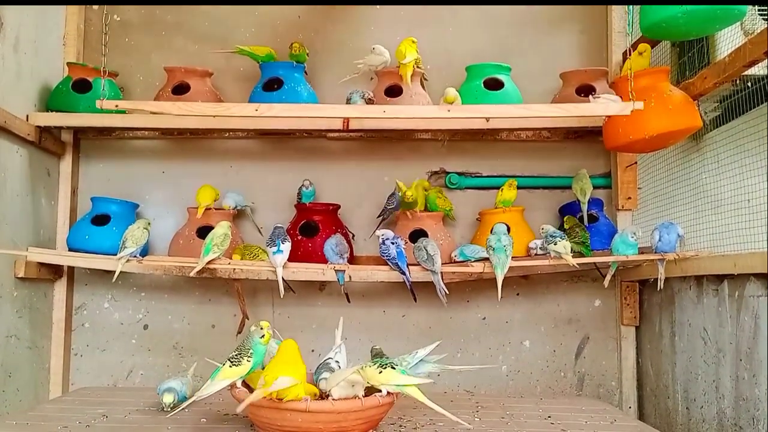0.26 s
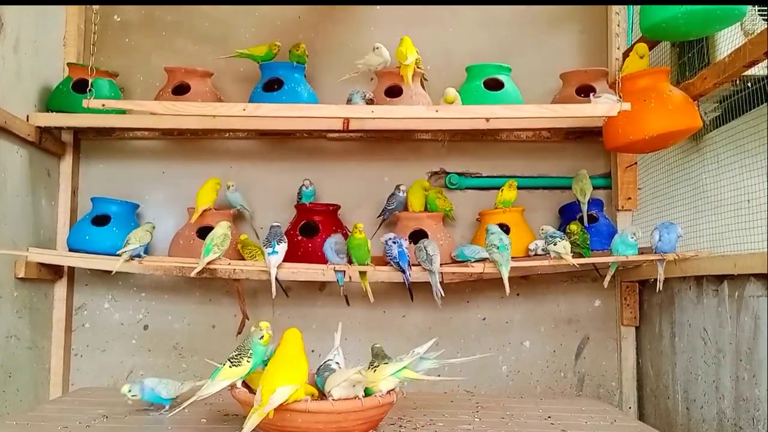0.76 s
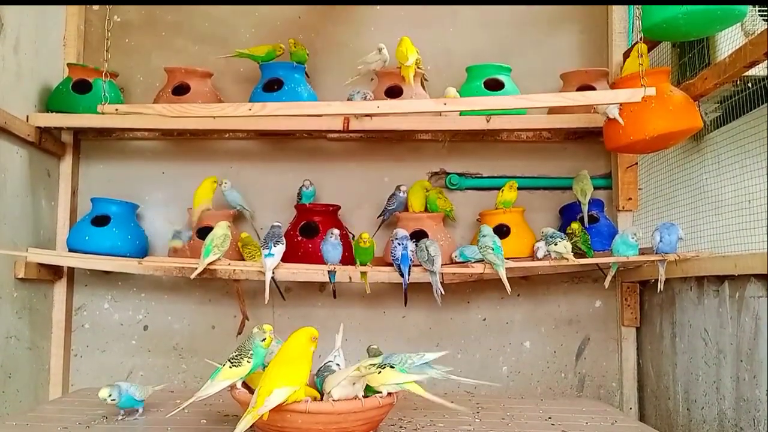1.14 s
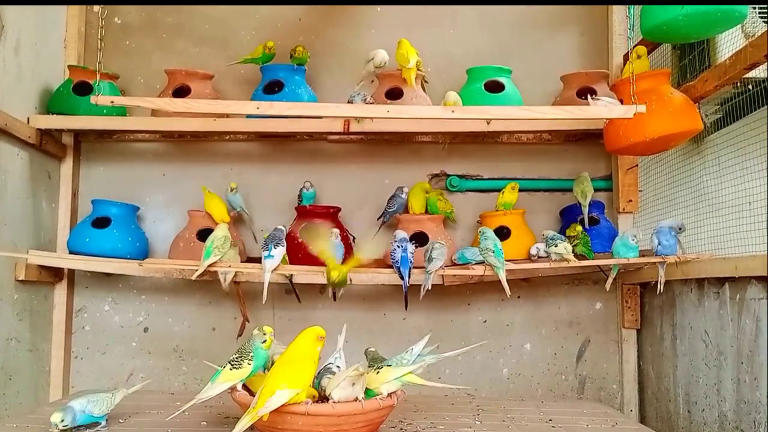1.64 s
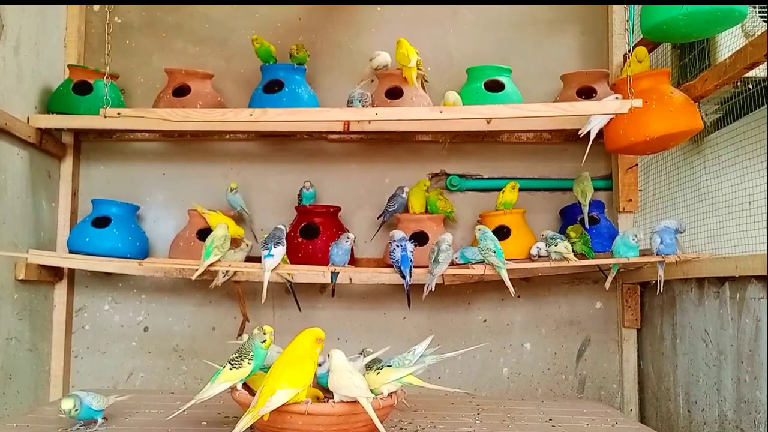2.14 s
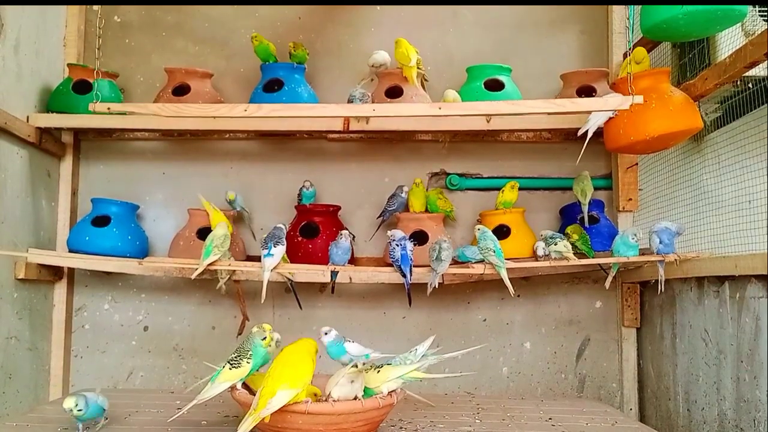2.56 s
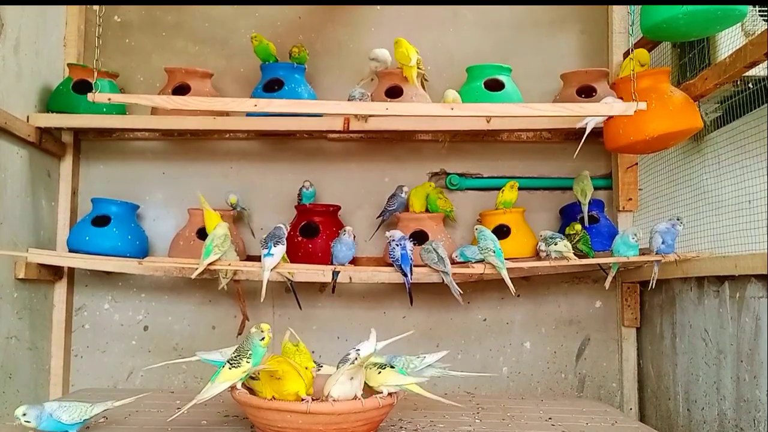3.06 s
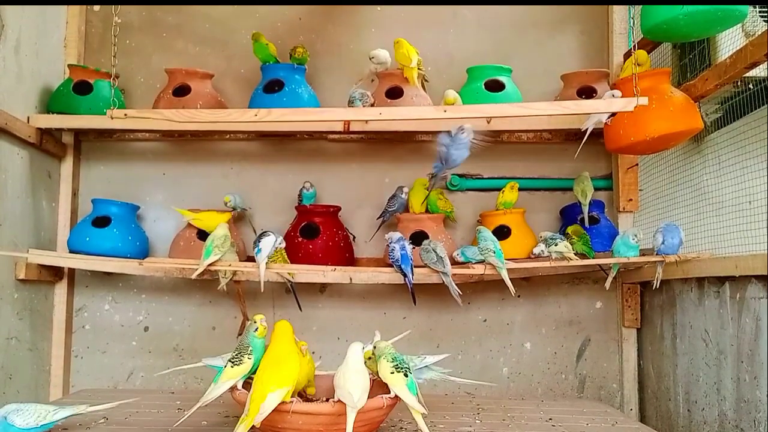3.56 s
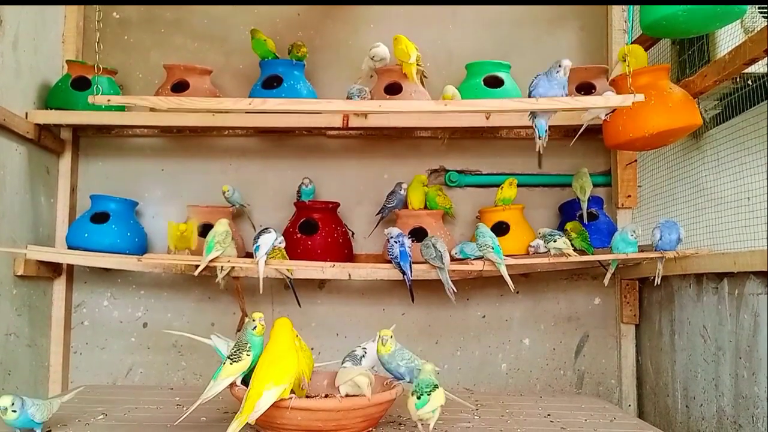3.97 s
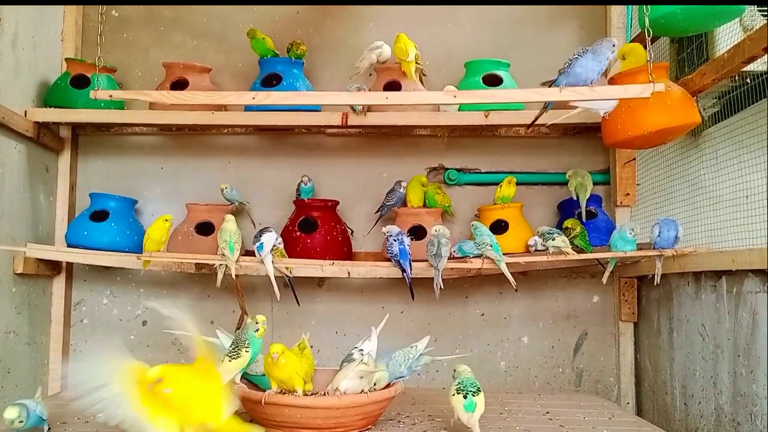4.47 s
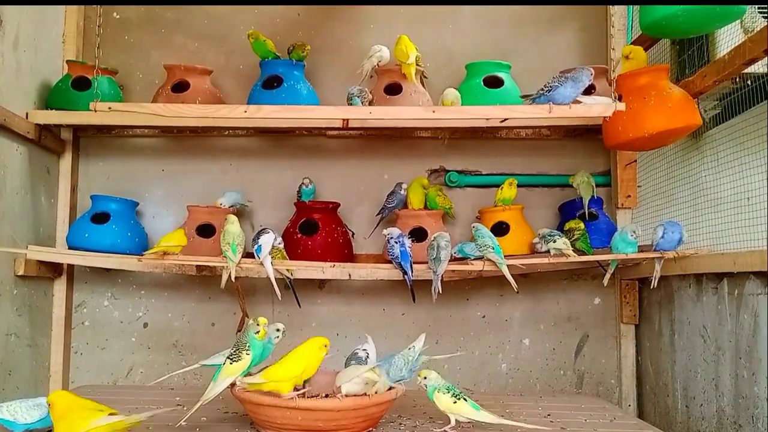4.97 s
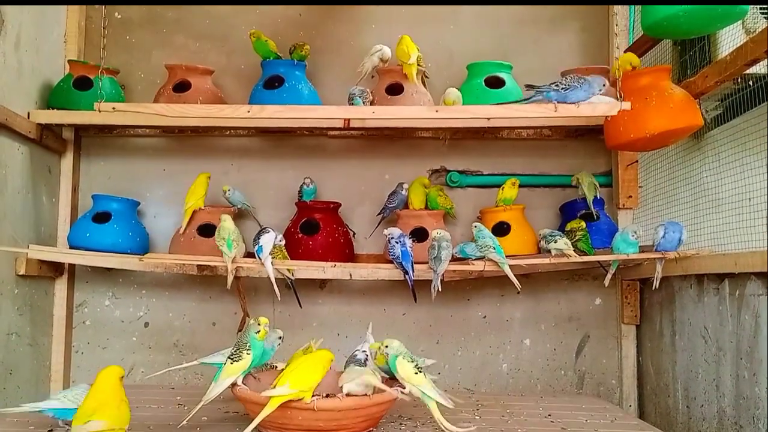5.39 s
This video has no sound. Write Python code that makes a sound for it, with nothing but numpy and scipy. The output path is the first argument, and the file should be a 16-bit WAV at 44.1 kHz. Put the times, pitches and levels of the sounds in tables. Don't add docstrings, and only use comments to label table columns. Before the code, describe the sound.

In a small hard-walled aviary, parrots begin with faint whistles and scattered peeps, then burst into bright cheeps and rough squawks. A hollow, throaty dove call sounds behind them, returns louder around the middle, and gives way to sharp screeches and warbles. Wing beats push low soft rumbles past a slightly hissy nearby microphone.

```python
import sys
import numpy as np
from scipy import signal
from scipy.fft import rfft, irfft
from scipy.io import wavfile

SR = 44100
rng = np.random.default_rng(int(sys.argv[2]) if len(sys.argv) > 2 else 0)


def convert_level_to_amplitude(level_db):
    exponent = np.asarray(level_db, float) / 20
    return 10 ** exponent


def bounce(signal):
    frames = np.transpose(np.atleast_2d(signal))
    limited = np.clip(frames, -1, 1)
    pcm = np.round(limited * 32767).astype(np.int16)
    wavfile.write(sys.argv[1], SR, pcm)


N = 247842


def at_hz(points, hz):
    table_hz, table_db = np.transpose(points)
    return np.interp(np.log(np.maximum(hz, 1)), np.log(table_hz), table_db)


def coloured(x, points):
    gain = convert_level_to_amplitude(at_hz(points, np.fft.rfftfreq(len(x), 1 / SR)))
    return irfft(rfft(x) * gain, len(x))


def rms_one(x):
    return x / np.sqrt(np.mean(x ** 2))


def noise_band(points):
    return rms_one(coloured(rng.standard_normal(N), points))


def wobble(rate_hz):
    r = np.exp(-2 * np.pi * rate_hz / SR)
    noise = rng.standard_normal(N + SR)
    return rms_one(signal.lfilter([1], [1, -2 * r, r * r], noise)[SR:])


def add(out, start_s, sound):
    i = round(start_s * SR)
    out[i:i + len(sound)] += sound[:N - i]


def wing_push():
    # (time [s], length [s], level [dB])
    beats = [(0.146, .06, -73), (0.457, 0.12, -67), (0.665, 0.036, -58), (.81, .05, -73),
             (1.047, 0.089, -71), (1.38, 0.069, -74), (1.847, 0.28, -61.5), (2.24, 0.048, -65),
             (2.622, 0.048, -61.5), (3.55, 0.034, -58.5), (3.664, 0.083, -61), (4.113, 0.11, -56.5),
             (4.674, 0.12, -57.5), (5.297, 0.14, -63.5)]
    steady_db, rise_share = -75, 0.36
    t = np.arange(N) / SR
    gain = np.full(N, convert_level_to_amplitude(steady_db))
    for s, length_s, level_db in beats:
        rise = (s - t) / (rise_share * length_s)
        fall = (t - s) / length_s
        gain += convert_level_to_amplitude(level_db) * np.exp(-2 * np.maximum(rise, fall))
    return gain


def air():
    # (frequency [Hz], level [dB per Hz])
    rumble_db = [(18, -62), (30, -29), (48, -2), (70, 5.5), (104, 5.5), (141, -7.5), (170, -15.5),
                 (220, -15), (370, -120)]
    # (frequency [Hz], level [dB per Hz])
    hiss_db = [(88, -5), (150, 5), (249, 3), (1090, -7.5), (1670, -6), (2320, -8.5), (3050, -11),
               (4160, -14), (4960, -12.5), (7900, -25), (9600, -14), (11900, -29), (15600, -25)]
    # (time [s], length [s], level [dB])
    rustles = [(1.91, .04, -69), (1.955, .03, -69), (1.997, .03, -67), (2.185, .004, -68),
               (2.688, .02, -63), (3.895, .012, -70), (4.726, .02, -60), (4.781, .004, -57),
               (4.868, .004, -57), (5.371, .008, -57), (5.46, .03, -62), (5.259, .004, -68)]
    out = noise_band(rumble_db) * wing_push() * convert_level_to_amplitude(0.91 * wobble(5))
    out += noise_band(hiss_db) * convert_level_to_amplitude(-72.5 + 2.2 * wobble(5.1))
    bright = noise_band([(3000, -71), (9500, 9.5), (12500, -1), (15000, 5.5)])
    for s, length_s, level_db in rustles:
        t = np.arange(round(3 * length_s * SR)) / SR
        add(out, s, convert_level_to_amplitude(level_db) * np.exp(-t / length_s) * bright[round(s * SR):][:len(t)])
    return out


def voice(pitch_hz, overtone_db):
    phase = 2 * np.pi * np.cumsum(pitch_hz) / SR
    out = np.sin(phase)
    for k in range(2, int(15500 / np.median(pitch_hz)) + 1):
        out += convert_level_to_amplitude(overtone_db(k)) * np.sin(k * phase + k * k)
    return np.sqrt(2) * out


def sung(rows, shake, throb, unsteady, throb_db, overtone_db):
    s, pitch_hz, level_db = np.transpose(rows)
    t = np.arange(s[0], s[-1], 1 / SR)
    at = (t * SR).astype(int) % N
    edge = np.clip(np.minimum(t - s[0], s[-1] - t) / 0.0016, 0, 1)
    tone = voice(np.interp(t, s, pitch_hz) * (1 + unsteady * shake[at]), overtone_db)
    return convert_level_to_amplitude(np.interp(t, s, level_db) + throb_db * throb[at]) * edge * tone


def dove():
    # (time [s], level [dB])
    opening_times = [
        (.55, -53),
        (2.949, -48),
    ]
    # (time from start [s], pitch [Hz], level [dB])
    opening_curve = [
        (0, 256, -16),
        (.04, 221.7, -7),
        (0.111, 250, -20.5),
    ]
    # (time [s], pitch [Hz], level [dB])
    coo_notes = [
        [(.72, 246, -66), (.76, 244.7, -60.5), (.9, 305.4, -50), (1.1, 318, -51.5), (1.13, 317, -71),
         (1.17, 347, -47), (1.36, 328, -52.5), (1.47, 231, -64)],
        [(1.42, 524, -67.5), (1.49, 487, -65), (1.53, 413, -59.5), (1.68, 418, -78.5)],
        [(3.12, 268, -72), (3.17, 251.3, -55), (3.32, 283, -64.5), (3.35, 282.4, -53), (3.6, 358.6, -44.5),
         (3.84, 356, -46), (3.9, 360, -82)],
        [(3.9, 405, -63.5), (4.03, 431, -62), (4.07, 457, -71), (4.14, 439, -61), (4.18, 445, -80)],
        [(3.9, 293, -64), (4.08, 275, -69.5)],
    ]
    flutter_hz = 48.0 * (1 + 0.296 * wobble(8.12))
    flutter = np.sin(2 * np.pi * np.cumsum(flutter_hz) / SR) + 0.7 * wobble(29)
    flutter = np.minimum(flutter, 1)
    out, shake = np.zeros(N), wobble(39.0)
    openings = [[(s + u, hz, level_db + db) for u, hz, db in opening_curve] for s, level_db in opening_times]
    for rows in openings + coo_notes:
        note = sung(rows, shake, flutter, unsteady=.065, throb_db=5, overtone_db=lambda k: -18 * k)
        add(out, rows[0][0], note)
    return out


def warbles(shake, throb):
    # (time [s], pitch [Hz], level [dB])
    warble_curves = [
        [(0.29, 1860, -63.5), (0.33, 1572, -63), (0.42, 2137, -64.5), (0.444, 1503, -56), (0.52, 1322, -70.5)],
        [(0.5, 1614, -69), (0.518, 2300, -56), (0.594, 2586, -69), (0.63, 2170, -60)],
        [(0.52, 2844, -60), (0.594, 3040, -69), (0.616, 3335, -51.5), (0.66, 2600, -90)],
        [(2.396, 2150, -60), (2.406, 2112, -49), (2.418, 2300, -60), (2.44, 2610, -52), (2.475, 2480, -51),
         (2.5, 2800, -56)],
        [(2.29, 3247, -68), (2.424, 3320, -66), (2.51, 3200, -45), (2.62, 3020, -77)],
        [(2.7, 3193, -55.5), (2.758, 3085, -76), (2.97, 3040, -66)],
        [(3.045, 2600, -60), (3.068, 3030, -56), (3.09, 3070, -51), (3.11, 3000, -62)],
        [(3.25, 2920, -67), (3.264, 2212, -47.5), (3.33, 2990, -54.5)],
        [(4.825, 3920, -43.5), (4.847, 3255, -39.5), (4.87, 3080, -46), (4.895, 3000, -55), (4.915, 3600, -42),
         (4.93, 3700, -52)],
        [(4.962, 4200, -56), (4.985, 3800, -41), (5.01, 3500, -44), (5.035, 3050, -48), (5.05, 2950, -62)],
        [(4.96, 2107, -65), (5.02, 1500, -50), (5.055, 1520, -66), (5.09, 1650, -55), (5.12, 1600, -64)],
    ]
    out = np.zeros(N)
    for rows in warble_curves:
        note = sung(rows, shake, throb, unsteady=.02, throb_db=4.0, overtone_db=lambda k: -34 - 4.0 * (k - 2))
        add(out, rows[0][0], note)
    return out


def chirp_rows():
    # (time [s], length [s], goal pitch [Hz], level [dB], second partial [dB])
    cheeps = [(1.036, 0.017, 3240, -46, 2), (1.111, 0.017, 3113, -50, -10), (1.453, 0.025, 2674, -60, 6),
              (1.524, 0.032, 2597, -60, 2), (1.607, 0.029, 2566, -55, 14), (1.667, 0.022, 2590, -55, 10),
              (1.675, .029, 2800, -51.5, 13), (1.749, 0.019, 2404, -45.5, 10.5),
              (1.76, 0.015, 2810, -40.5, 11.5), (1.833, .012, 2482, -39, 9.5),
              (2.471, 0.055, 3154, -48, -10), (4.778, 0.025, 2480, -61.5, 18),
              (5.399, 0.016, 2297, -60, 13), (5.459, .016, 2560, -58.5, 11.5),
              (5.363, 0.024, 3230, -57.5, -21)]
    # (time [s], length [s], goal pitch [Hz], level [dB])
    back_cheeps = [
        (3.301, 0.018, 2925, -49),
        (3.387, 0.023, 3160, -53.5),
        (3.446, .026, 3100, -50),
        (3.583, .02, 3110, -51.5),
        (3.717, 0.02, 2990, -53),
        (3.804, 0.025, 3283, -39),
        (4.045, .025, 2745, -41.5),
        (4.199, 0.03, 2850, -41),
    ]
    # (time [s], length [s], pitch [Hz], level [dB])
    peeps = [(.369, 0.056, 4000, -69.5), (.439, 0.028, 9100, -63.5), (.628, 0.015, 1965, -57),
             (.575, .02, 4640, -56), (.911, 0.03, 3100, -50), (.914, .03, 6100, -58),
             (1.396, .04, 1588, -66), (1.993, .05, 1850, -72), (2.013, .044, 2283, -65.5),
             (2.035, 0.05, 3320, -59.5), (2.059, 0.11, 3020, -67), (2.199, 0.042, 729, -55),
             (2.652, .0093, 3770, -52), (2.29, .11, 1530, -61), (2.98, 0.063, 452, -66),
             (3.078, 0.064, 7860, -73), (3.009, 0.017, 2015, -55.5), (3.089, 0.05, 5440, -51.5),
             (3.161, .057, 4000, -61), (3.238, 0.045, 3300, -51), (3.493, 0.038, 3367, -48),
             (3.514, 0.056, 2117, -53), (4.342, 0.011, 3270, -45), (4.615, 0.03, 6250, -42),
             (4.585, .04, 4050, -56), (2.632, .015, 2780, -56), (2.378, .02, 2700, -62),
             (1.598, .025, 4000, -56), (5.54, .02, 4200, -62), (5.415, .02, 1320, -66),
             (5.505, .014, 10300, -58), (5.21, .03, 6200, -64), (5.055, .06, 6200, -55),
             (2.945, .03, 1250, -66), (2.955, .02, 2650, -60), (4.873, 0.014, 2525, -45),
             (4.821, 0.015, 2054, -54), (4.997, 0.025, 6400, -52), (5.008, .017, 4420, -50),
             (5.065, 0.016, 3070, -42), (5.082, .04, 3000, -48), (5.204, 0.024, 3050, -45.5),
             (2.835, 0.075, 1290, -64), (4.351, 0.056, 1668, -53), (5.221, 0.04, 1650, -56)]
    # (time [s], length [s], pitch [Hz], level [dB])
    chups = [
        (0.19, 0.023, 1388, -70),
        (2.806, 0.015, 1462, -64),
        (2.958, .023, 4905, -56.5),
        (2.997, 0.048, 3370, -54),
        (3.32, 0.1, 1441, -61.5),
        (3.62, 0.041, 1420, -57),
        (3.829, 0.03, 1440, -55),
        (4.726, 0.035, 3060, -61),
        (5.609, 0.032, 1324, -56.5),
    ]
    # (time [s], length [s], pitch [Hz], level [dB])
    tweets = [
        (.975, 0.02, 2608, -45.5),
        (4.287, 0.02, 2470, -47),
        (4.796, 0.029, 2502, -45),
    ]
    # (time [s], length [s], first pitch [Hz], last pitch [Hz], level [dB])
    slides = [(2.436, 0.052, 2350, 1876, -53), (2.633, 0.012, 5750, 5650, -54.5),
              (2.648, 0.03, 2300, 1500, -56), (2.98, 0.015, 7400, 7350, -58), (3.035, .04, 7000, 8000, -58),
              (3.09, .04, 8100, 8300, -60), (3.56, 0.0454, 3324, 3165, -44.5),
              (1.759, 0.013, 5500, 5700, -18.5), (1.832, 0.013, 4900, 4958, -23),
              (1.455, .025, 9300, 10500, -58), (1.455, .02, 7000, 7900, -56), (1.528, .03, 7300, 7900, -56),
              (1.535, .03, 10200, 10400, -60), (1.112, .03, 8000, 8900, -57), (3.385, .01, 4000, 6500, -50),
              (2.02, .1, 6300, 6800, -66), (4.991, 0.025, 5050, 4850, -43.5),
              (5.334, 0.033, 1850, 2224, -59.5), (3.299, .025, 9800, 11700, -52),
              (.027, .022, 2700, 3250, -60), (.026, .02, 5000, 5300, -55), (4.9, .03, 3500, 4600, -50),
              (4.79, .025, 5000, 5800, -42), (1.588, .02, 5200, 3400, -54), (3.196, .012, 7200, 7000, -55)]
    cheep_first_hz, back_first_hz = 2310, 2260
    rows = [(s, d, cheep_first_hz, hz, db, second_db) for s, d, hz, db, second_db in cheeps]
    beak_hz, second_db_per_khz = 2860, -8.5
    for s, d, hz, db in back_cheeps:
        second_db = 6.5 + second_db_per_khz * (hz - beak_hz) / 1e3
        rows.append((s, d, back_first_hz, hz, db, second_db))
    for table, sag, second_db in [(peeps, 0.05, -16), (chups, 0.029, -3.5), (tweets, 0.043, 7.5)]:
        rows += [(s, d, hz * (1 + sag), hz, db, second_db) for s, d, hz, db in table]
    return rows + [(*row, -22) for row in slides]


def chirps(shake, throb):
    onset_s = .003
    turned_away_s = (3.29, 4.35)
    out = np.zeros(N)
    breath = noise_band([(1200, -31.0), (2200, -7.0), (6000, 12.5), (11000, -7.5), (13000, -25)])
    for s, length_s, first_hz, last_hz, level_db, second_db in chirp_rows():
        u = np.linspace(0, 1, round(np.clip(length_s, .005, .3) * SR))
        at = (round(s * SR) + np.arange(len(u))) % N
        pitch_hz = last_hz + (first_hz - last_hz) * np.exp(-5.5 * u)
        pitch_hz *= 1 + .021 * shake[at]
        fall_db = -22 if turned_away_s[0] < s < turned_away_s[1] else -7
        onset = 0.5 * np.minimum(u * length_s / onset_s, 1) ** 2
        shape = np.minimum(onset + u / 0.75, 1) * np.cos(np.pi * u / 2) ** 0.75
        sound = voice(pitch_hz, lambda k: second_db + fall_db * (k - 2))
        sound += convert_level_to_amplitude(second_db - 14.0) * breath[at]
        add(out, s, convert_level_to_amplitude(level_db + 3.97 * throb[at]) * shape * sound)
    return out


def squawk_calls():
    # (time [s], length [s], pitch [Hz], level [dB], second partial [dB])
    scolds = [
        (.000, 0.024, 3000, -69.5, 10),
        (1.032, 0.026, 1312, -66.5, 2.5),
        (1.589, 0.047, 1998, -65, 7.5),
        (1.752, .078, 1384, -54, 2.5),
        (1.804, 0.045, 1691, -67.5, 17.5),
    ]
    # (time [s], length [s], pitch [Hz], level [dB])
    chatter = [
        (3.177, 0.11, 2420, -62),
        (3.351, 0.11, 2862, -59),
        (3.44, 0.098, 2337, -60),
        (3.508, 0.068, 2613, -52.5),
        (3.577, 0.11, 2406, -65),
        (3.636, 0.078, 2897, -55),
        (3.711, 0.0742, 2377, -53.5),
        (5.458, 0.028, 2494, -61.5),
        (5.485, 0.069, 3370, -55),
        (5.489, 0.04, 846, -63.5),
    ]
    # (time [s], length [s], pitch [Hz], level [dB])
    croaks = [
        (.027, 0.02, 1340, -68),
        (.155, 0.014, 1300, -81),
        (.779, 0.038, 649.3, -71.5),
        (1.219, 0.018, 676, -83.5),
        (1.366, 0.035, 664, -84),
    ]
    # (time [s], length [s], pitch [Hz], level [dB])
    hoarse = [(.335, 0.058, 595, -61), (.48, 0.2, 4140, -68.5), (.056, 0.23, 5470, -69.5),
              (.85, 0.061, 920, -69), (2.145, .12, 5130, -60), (2.275, 0.14, 5200, -66),
              (2.147, 0.085, 1029, -61.5), (2.339, 0.25, 3650, -62.5), (2.43, 0.079, 2504, -50.5),
              (2.633, 0.041, 2004, -56.5), (2.969, 0.076, 3260, -58.5), (3.03, 0.04, 2480, -52),
              (4.66, 0.06, 700, -68), (.853, .04, 3000, -63), (1.02, .03, 3800, -59),
              (3.72, .06, 4700, -46), (4.9, 0.031, 3896, -43), (5.236, 0.07, 1072, -71.5),
              (.538, 0.1, 2616, -65), (0.641, 0.088, 2438, -61), (5.225, 0.085, 4250, -70),
              (4.82, .06, 6550, -52), (1.77, .06, 2500, -47), (1.86, .08, 5500, -52),
              (3.196, .03, 4800, -54)]
    # (time [s], length [s], pitch [Hz], level [dB], share of length before the peak [0-1])
    screeches = [
        (3.927, .068, 3350, -40.5, .42),
        (4.052, .12, 3550, -35, .45),
        (4.262, .055, 2900, -53, .4),
        (4.371, .042, 2680, -44.5, .5),
        (4.476, .066, 2720, -42, .22),
        (4.626, .07, 3170, -44, .4),
    ]
    # (second partial [dB], roughness [0-1])
    kinds = [
        (-2, 0.63),
        (10, .15),
        (-26.5, 0.2),
    ]
    rough, peak_share = .38, .28
    calls = [(*row, rough, peak_share) for row in scolds]
    calls += [(*row, 10.5, rough, peak) for *row, peak in screeches]
    for rows, kind in zip([chatter, croaks, hoarse], kinds):
        calls += [(*row, *kind, peak_share) for row in rows]
    return calls


def squawks(shake, throb):
    # (frequency [Hz], level [dB])
    throat = [(1300, -5), (2500, -3), (4000, 9.5), (6500, 3.5), (8500, -8.5), (11000, -9), (15000, -10.5)]
    pulse_mean_hz, pulse_uneven, pulse_db, pulse_sweep = 205, .17, 12, .2
    rush_share, fizz_db = 1.2, 10.5
    side_on_s, side_on_db = (4.25, 4.45), -14
    out = np.zeros(N)
    rush = noise_band([(1100, -54), (2000, -2.5)] + throat[1:])
    dull = signal.sosfilt(signal.butter(4, 7000, fs=SR, output="sos"), rush)
    fizz = signal.sosfilt(signal.butter(4, 7000, "high", fs=SR, output="sos"), rush)
    pulse_hz = pulse_mean_hz * (1 + pulse_uneven * wobble(60))
    for s, length_s, call_hz, level_db, second_db, rough, peak in squawk_calls():
        u = np.linspace(0, 1, round(np.clip(length_s, .005, .3) * SR))
        at = (round(s * SR) + 3000 + np.arange(len(u))) % N
        turn = 2 * np.pi * np.cumsum(pulse_hz[at]) / SR
        skew = np.log(.5) / np.log(np.clip(peak, .1, .7))
        shape = np.sin(np.pi * u ** skew) ** 0.8
        push_db = np.clip(level_db + second_db + 15.5, -30, 0) + 20 * np.log10(shape + .03)
        push_db += side_on_db * (side_on_s[0] < s < side_on_s[1])
        bend = rough * (.18 * shake[at] - pulse_sweep * np.cos(turn))
        pitch_hz = call_hz * (1 + 0.046 * np.sin(np.pi * u) + bend)

        def overtone_db(k):
            top_db = .5 * push_db * max(np.log2(k * call_hz / 6500), 0)
            return second_db + at_hz(throat, k * call_hz) + top_db

        sound = voice(pitch_hz, overtone_db)
        rushing = rush_share * rough ** 2 * dull[at] + convert_level_to_amplitude(fizz_db + 0.45 * push_db) * fizz[at]
        sound += convert_level_to_amplitude(second_db) * shape * rushing
        slap_db = rough * (2.4 * throb[at] + pulse_db * np.sin(turn))
        add(out, max(s, 0), convert_level_to_amplitude(level_db + slap_db) * shape * sound)
    return out


def aviary(x):
    t60_s, treble_t60_s, late_t60_s, late_db = 0.21, 0.15, .45, -27
    t = np.arange(SR) / SR
    noise = rng.standard_normal(SR) * (t > .004)
    dull = signal.sosfilt(signal.butter(2, 5500, fs=SR, output="sos"), noise)
    tail = dull * (convert_level_to_amplitude(-60 * t / t60_s) + convert_level_to_amplitude(late_db - 60 * t / late_t60_s))
    tail += (noise - dull) * convert_level_to_amplitude(-60 * t / treble_t60_s)
    return signal.fftconvolve(x, tail / np.sqrt(np.sum(tail ** 2)))[:N]


def scene():
    # (frequency [Hz], level [dB])
    microphone_db = [(200, -5.5), (3000, -0.5), (7000, -10.5), (10000, -4.5), (11500, -14), (13000, -22),
                     (14200, -13), (15200, -9)]
    shake, throb = wobble(360), wobble(130)
    flock = chirps(shake, throb) + squawks(wobble(847), throb) + warbles(shake, wobble(74))
    flock = coloured(flock, microphone_db)
    coo = dove()
    echoes = convert_level_to_amplitude(-1.5) * aviary(flock + convert_level_to_amplitude(-6.5) * coo)
    return (flock + echoes + convert_level_to_amplitude(-1.5) * coo + air())[None]


def roll_off(x):
    return signal.sosfilt(signal.butter(12, 16580, fs=SR, output="sos"), x)


def record(dry):
    low_pass = signal.ellip(10, 1, 70, 15550, fs=SR, output="sos")
    return roll_off(signal.sosfilt(low_pass, dry))


dry = scene()
out = record(dry)
bounce(out)
```